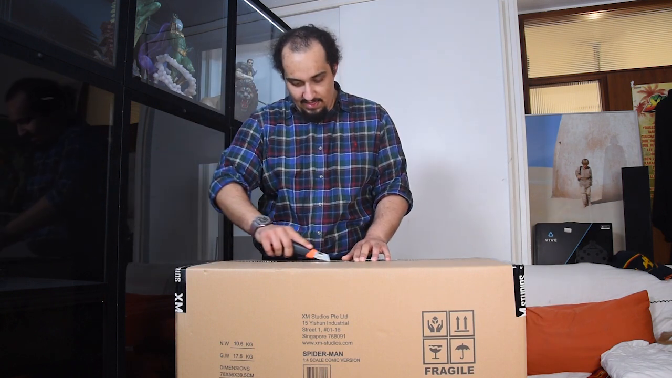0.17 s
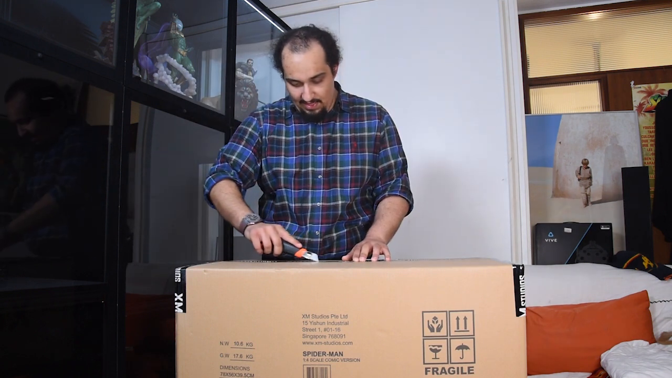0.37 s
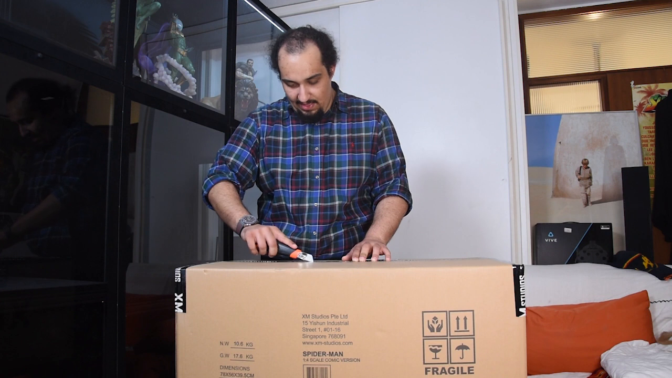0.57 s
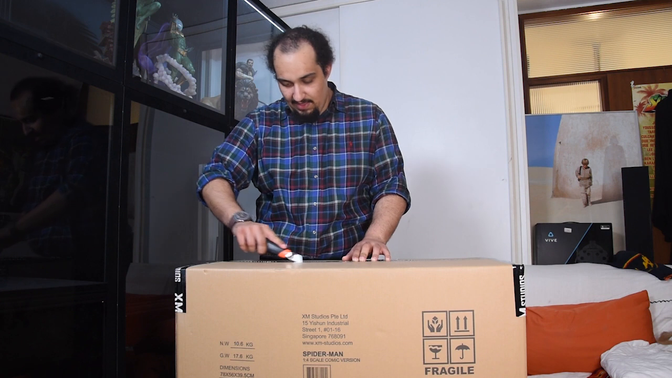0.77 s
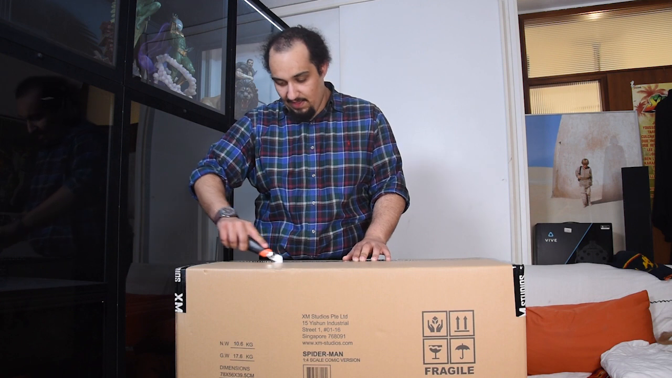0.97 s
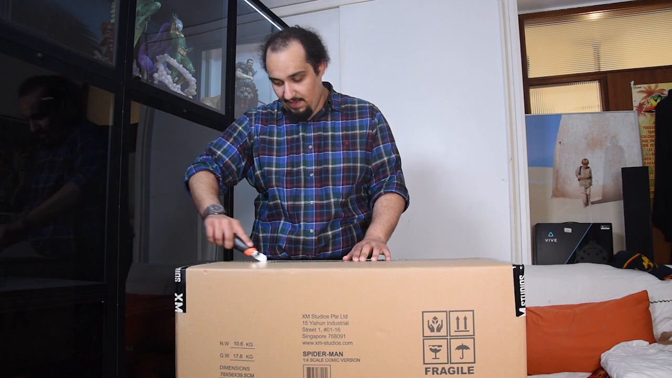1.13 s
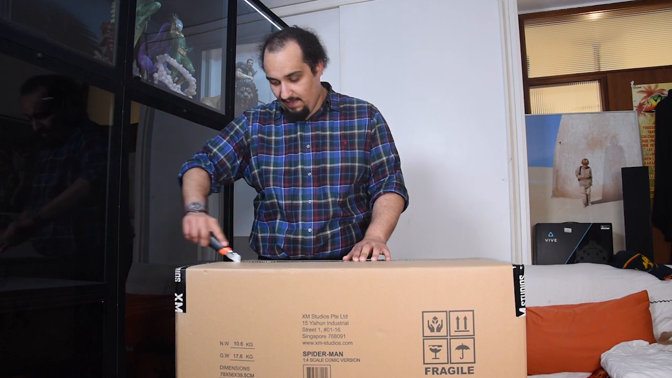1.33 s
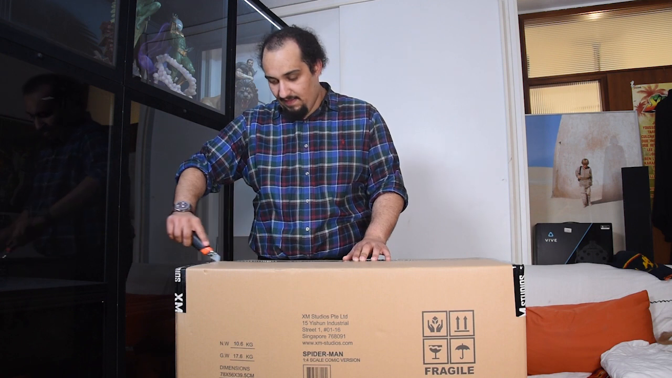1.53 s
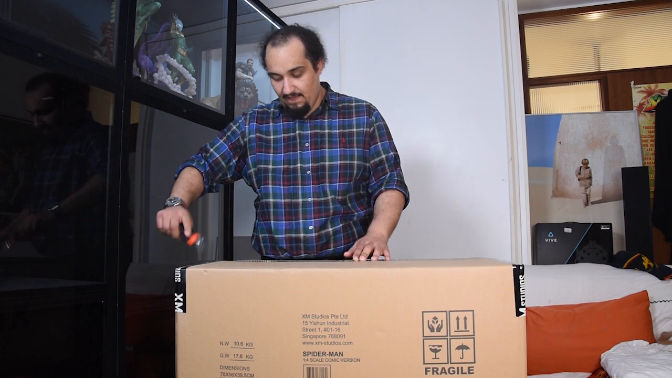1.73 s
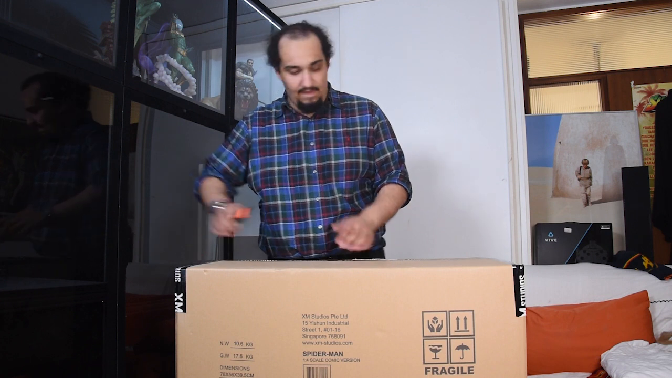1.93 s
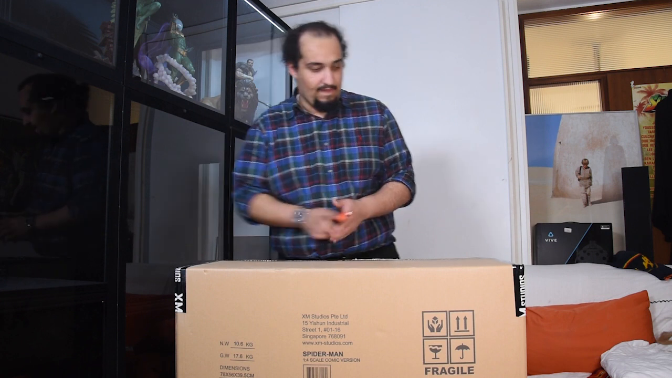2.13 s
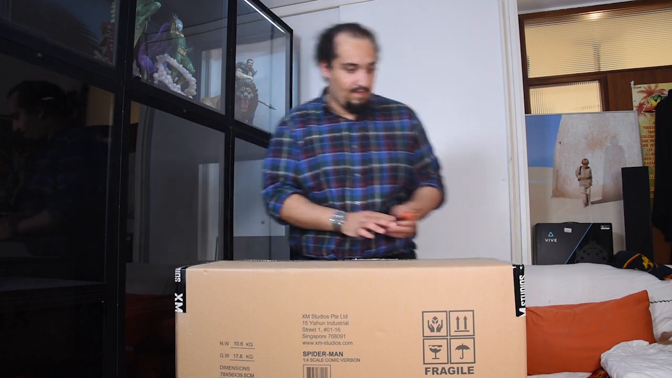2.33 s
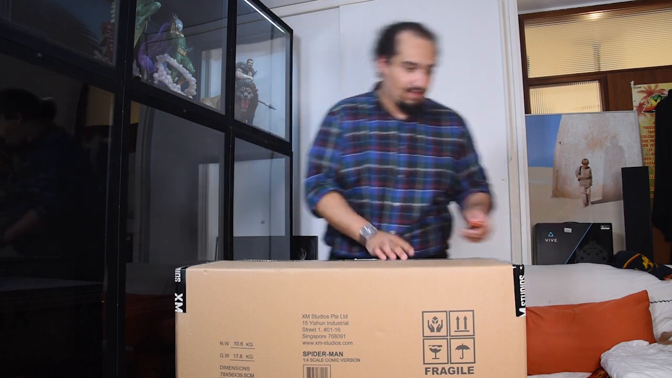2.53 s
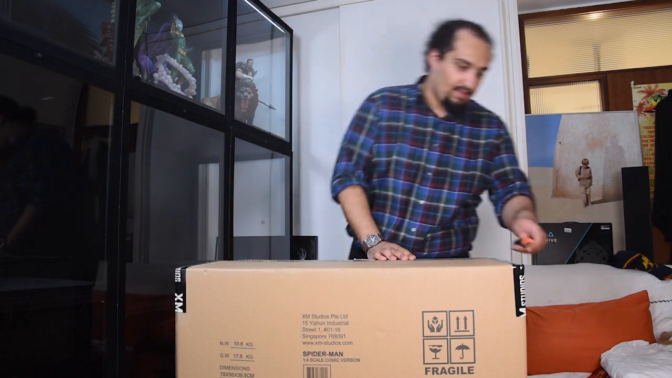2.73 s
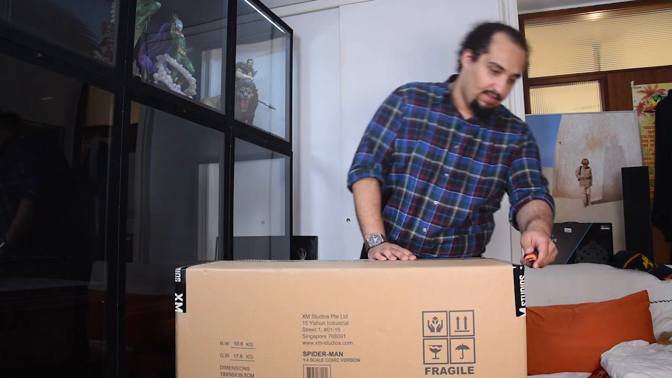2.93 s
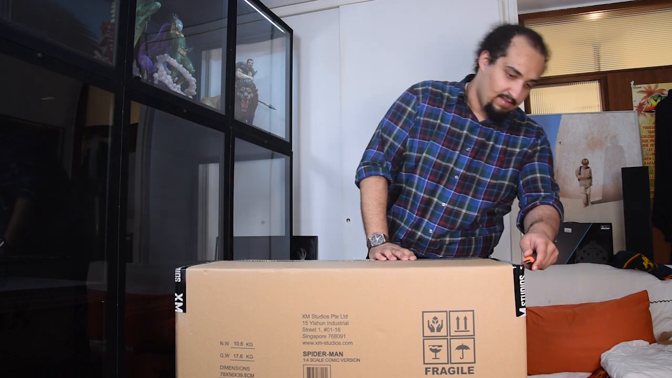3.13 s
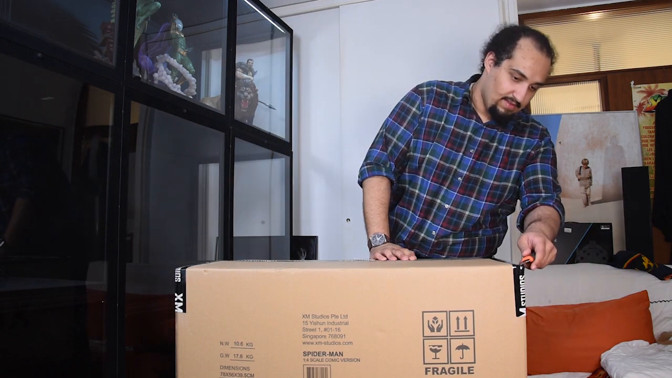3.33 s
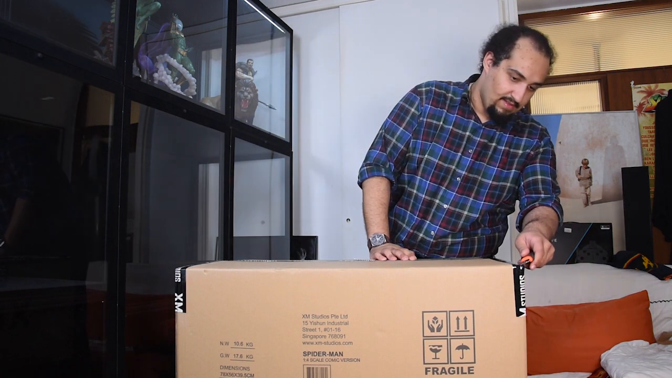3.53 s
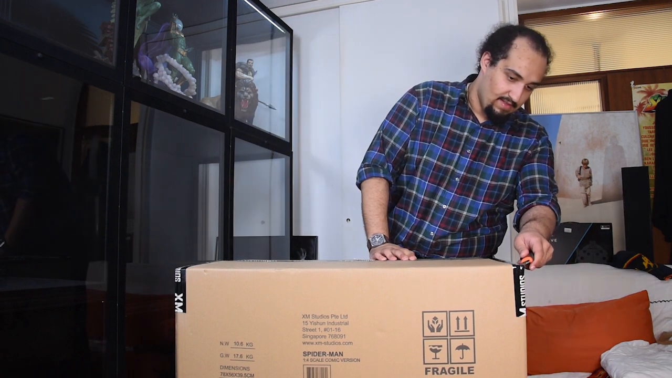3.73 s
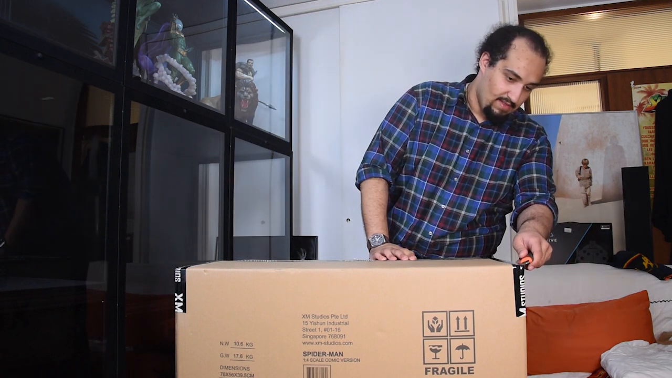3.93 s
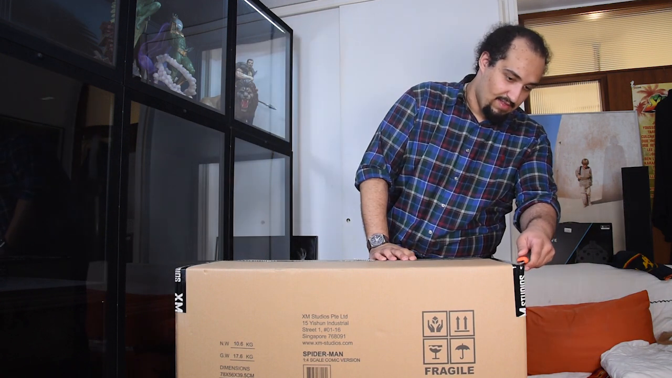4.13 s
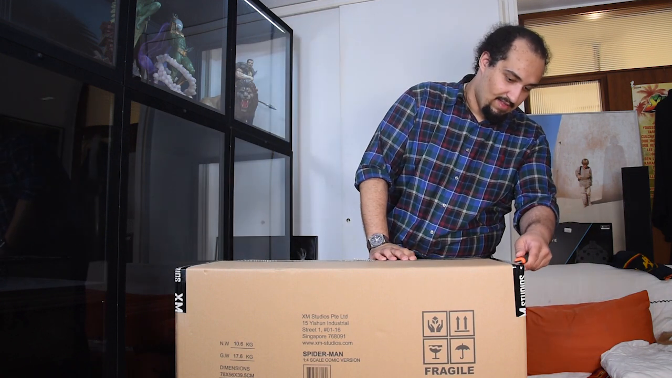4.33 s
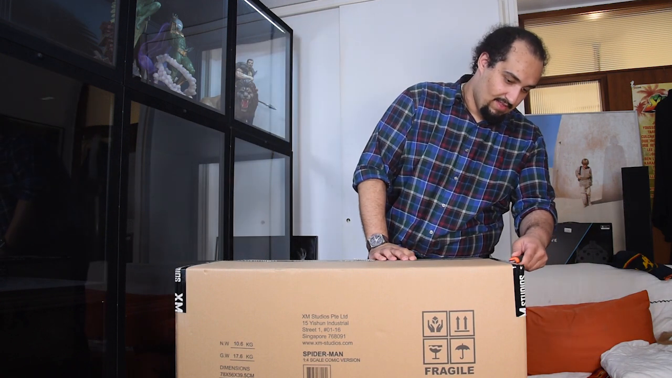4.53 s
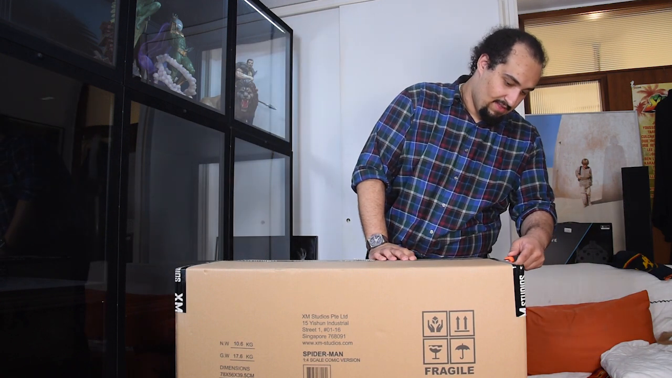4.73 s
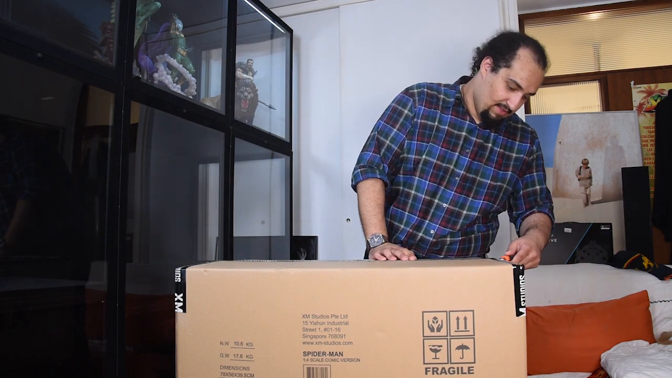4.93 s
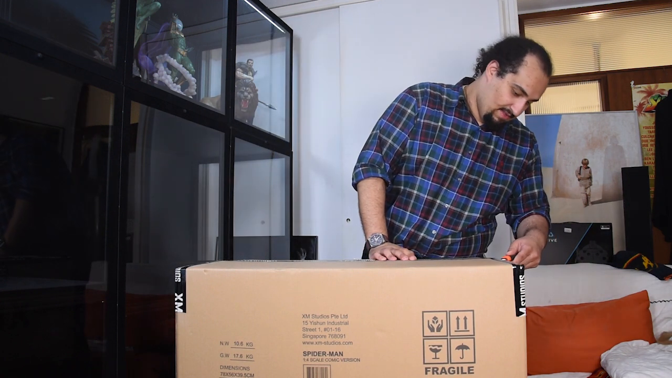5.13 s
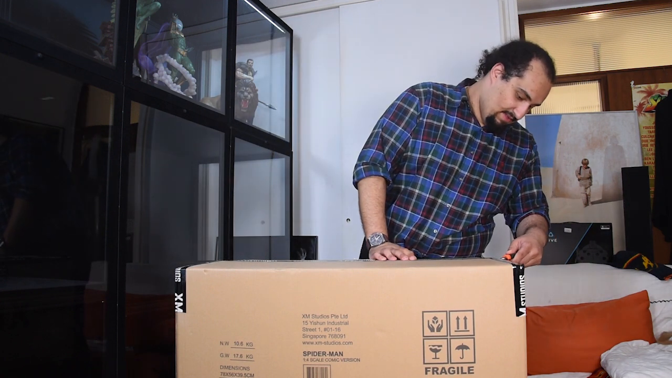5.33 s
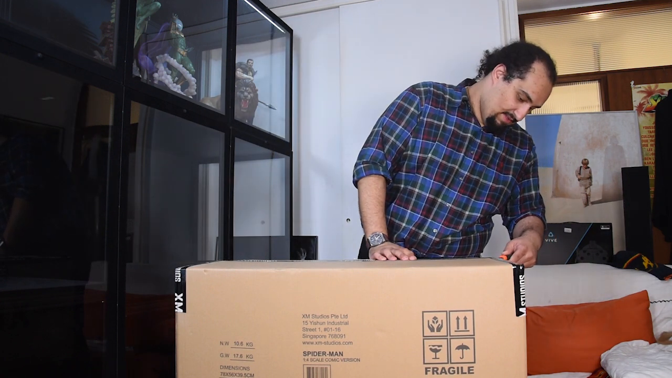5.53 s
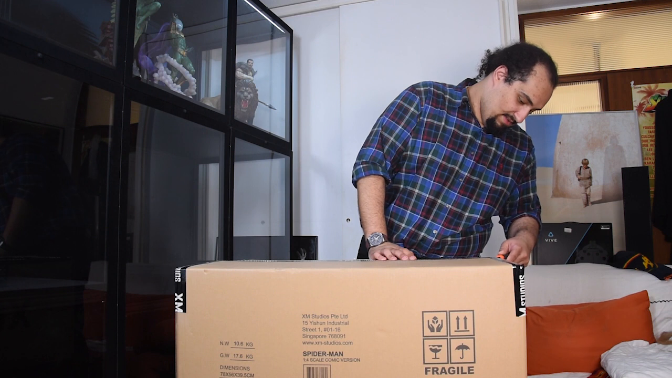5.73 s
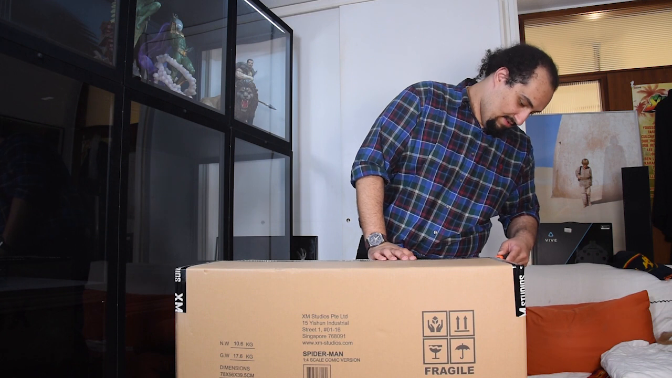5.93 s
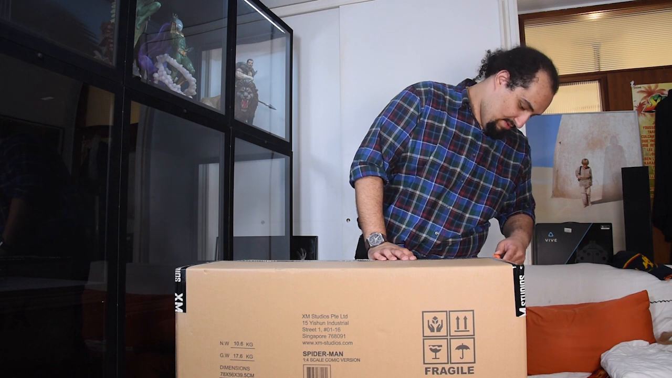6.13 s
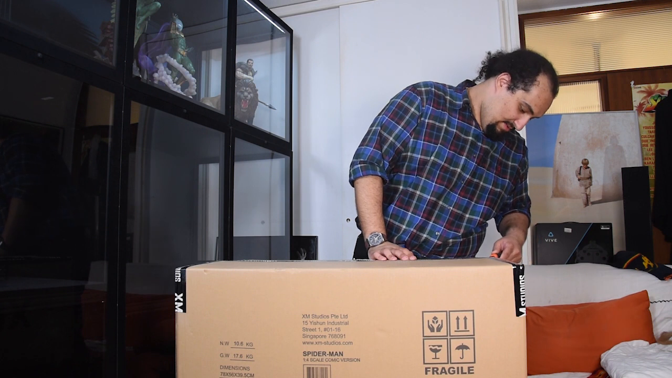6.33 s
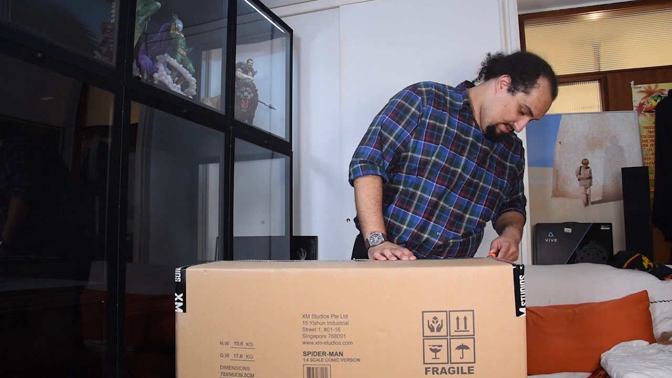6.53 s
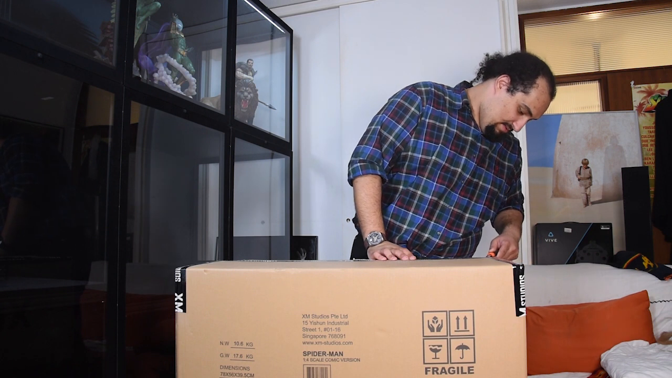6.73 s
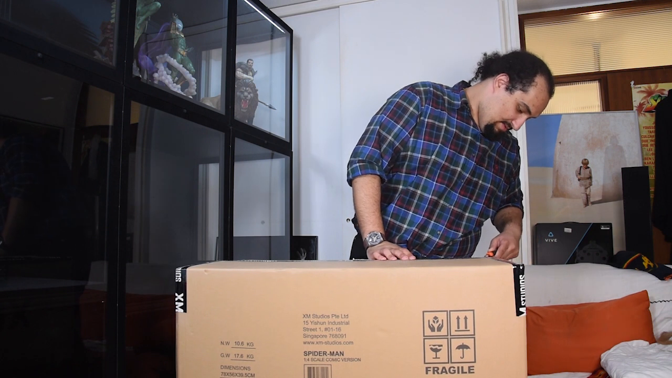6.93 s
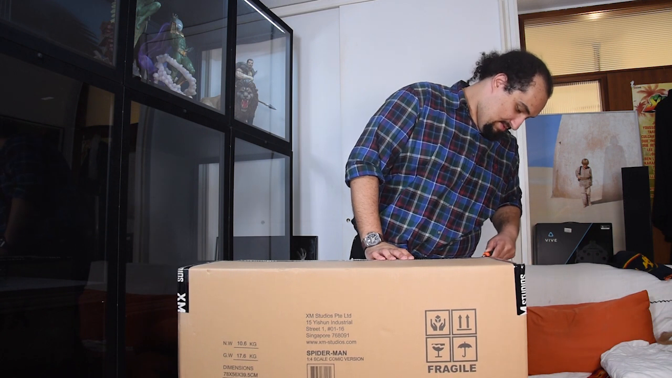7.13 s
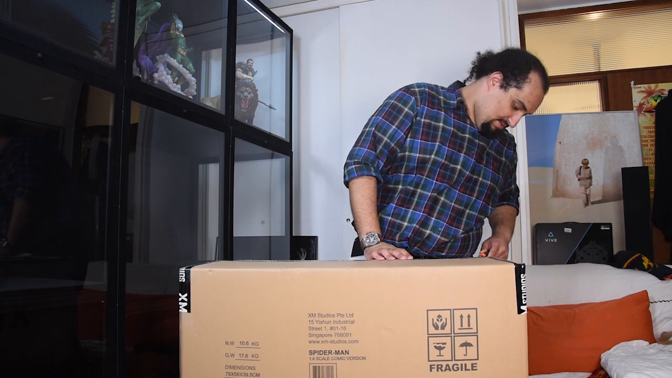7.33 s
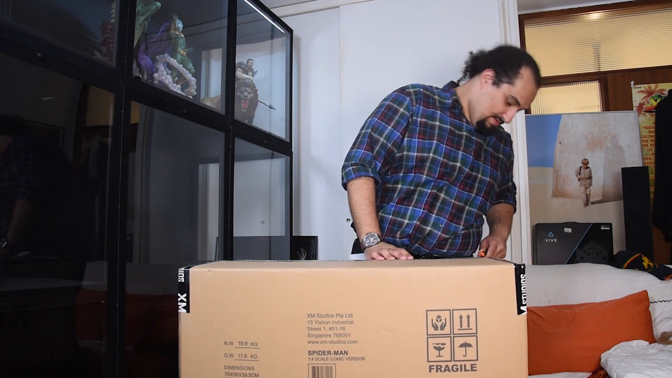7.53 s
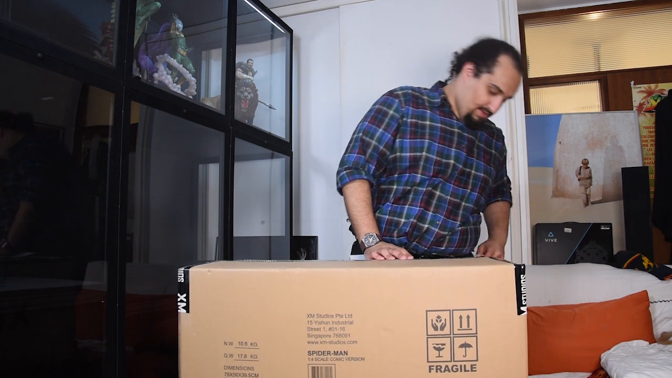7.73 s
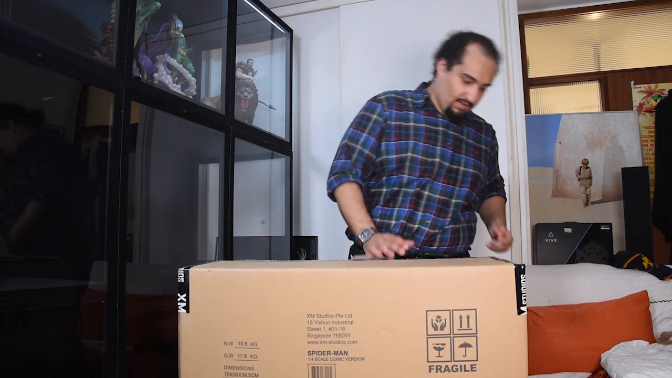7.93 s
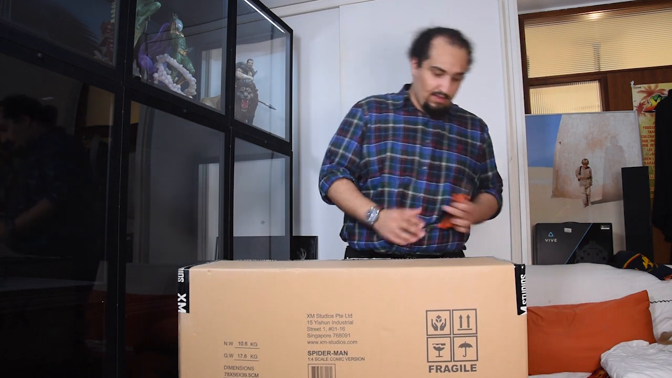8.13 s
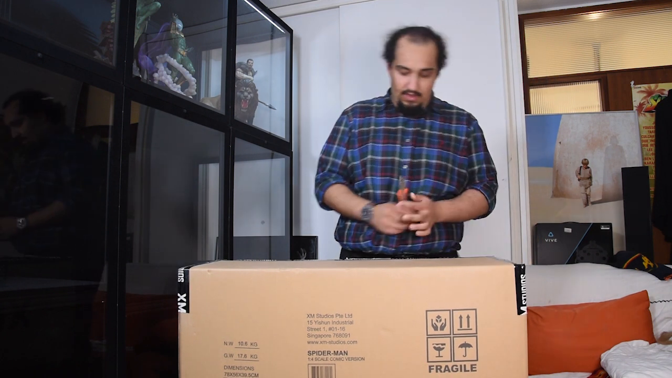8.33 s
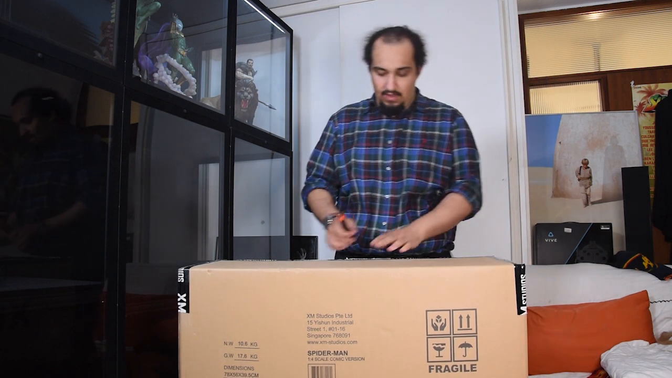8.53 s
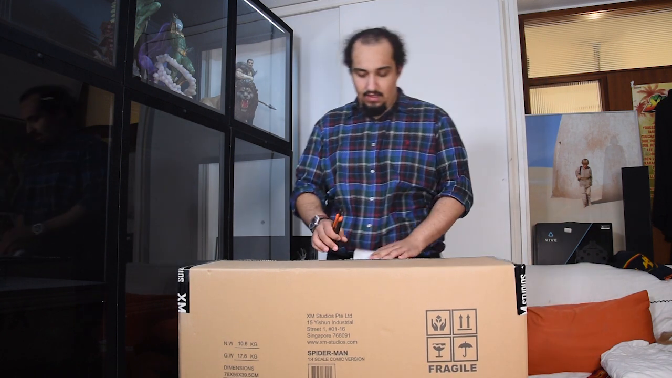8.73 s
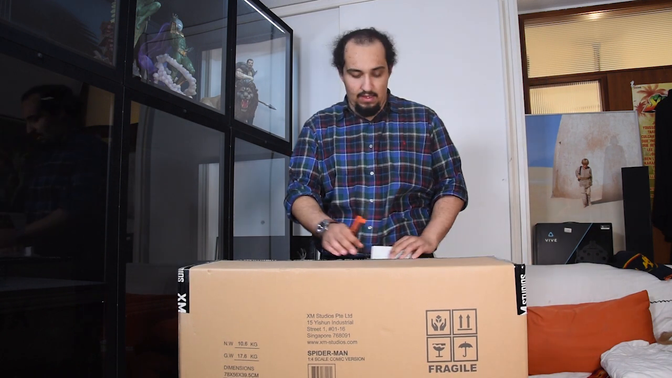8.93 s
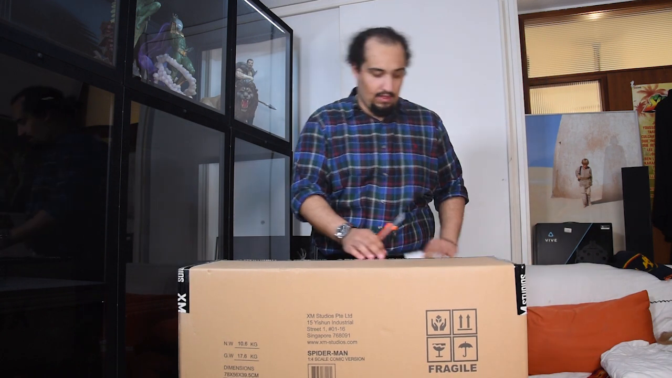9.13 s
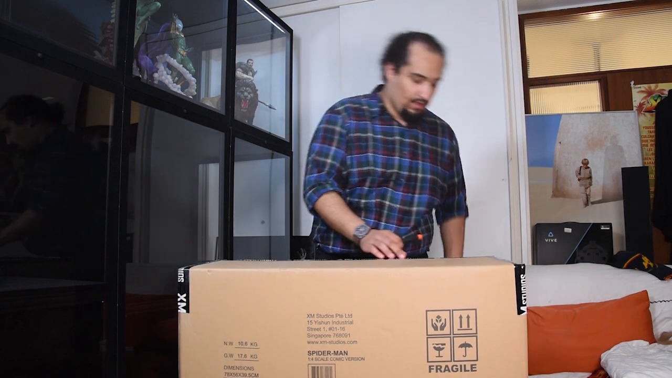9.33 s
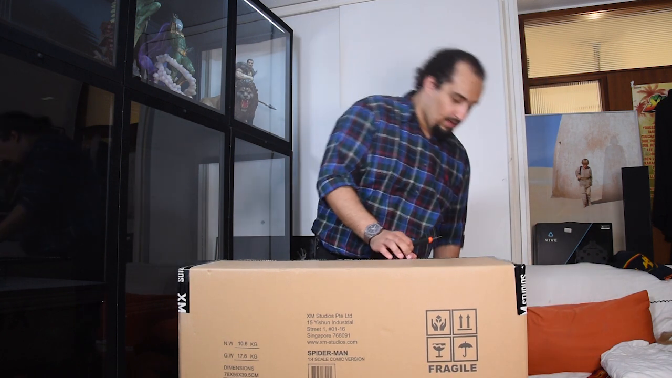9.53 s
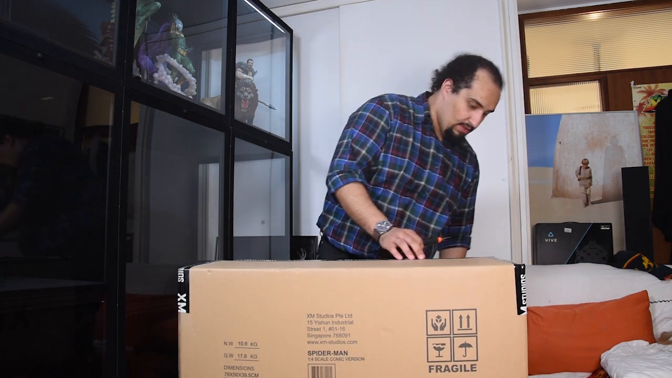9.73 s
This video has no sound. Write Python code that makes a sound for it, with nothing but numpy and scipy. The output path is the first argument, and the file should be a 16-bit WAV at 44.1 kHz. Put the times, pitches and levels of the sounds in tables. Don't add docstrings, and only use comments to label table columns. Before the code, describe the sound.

Hands knock and pat a large carton, a cutter tears through its tape in rough bursts, and finally a palm sweeps dryly across the top.

```python
import sys
import numpy as np
from scipy import signal
from scipy.fft import rfft, irfft
from scipy.io import wavfile

SR = 44100
rng = np.random.default_rng(int(sys.argv[2]) if len(sys.argv) > 2 else 0)


def to_wav(s):
    ch = np.atleast_2d(s).T
    pcm = np.round(np.clip(ch, -1, 1) * 32767)
    wavfile.write(sys.argv[1], SR, pcm.astype(np.int16))


def volts_from_db(level):
    exponent = np.asarray(level, float) / 20
    return 10 ** exponent


N = 431298

# pitch_hz, level_db (per Hz)
HISS_COLOUR = [(15, -31), (25, -11), (140, 4), (253, -5), (530, -5), (2120, -23), (9580, -17.5),
               (15600, -10)]
# start_s, level_db
HANDLING = [
    [(0.0, -46.5), (0.154, -55), (0.318, -47), (0.568, -58.5), (0.724, -49.5), (0.855, -39.5)],
    [(1.75, -47), (1.898, -51), (2.17, -51.5)],
    [(2.185, -42.5), (2.227, -45.5), (2.363, -44), (2.8, -47), (2.9, -43.5), (3.0, -46)],
    [(3.01, -44.5), (3.254, -43.5), (3.406, -46), (3.496, -53), (3.968, -52), (4.02, -61)],
    [(7.075, -40), (7.14, -35.5), (7.22, -41), (7.32, -39.5)],
    [(7.96, -46), (8.036, -50.5), (8.298, -54.5), (8.69, -51.5)],
    [(9.08, -33.5), (9.235, -28), (9.26, -39.5), (9.36, -35.5), (9.45, -44.5), (9.51, -43.5), (9.56, -38.5),
     (9.72, -41), (9.78, -40)],
]
# scrape_db, panel_db
HANDLING_MIX = [(-10, 4.5), (-0.5, -14), (2, -1.5), (-3.5, -6.5), (-1.5, -11), (6.5, 2.5), (-3.5, -7.5)]
# start_s, level_db
CUTS = [
    [(0.862, -28.5), (0.918, -24.5), (1.042, -35), (1.338, -20.5), (1.526, -24), (1.576, -29), (1.698, -32),
     (1.74, -67)],
    [(4.03, -43.5), (4.096, -38), (4.222, -44), (4.42, -41.5)],
    [(4.43, -35.5), (4.494, -30), (4.646, -33.5), (4.926, -37.5), (5.074, -31.5), (5.12, -32),
     (5.16, -28.5), (5.22, -35.5), (5.27, -49), (5.44, -50)],
    [(5.46, -42), (5.526, -31.5), (5.646, -23), (5.7, -32)],
    [(5.71, -27), (5.826, -27), (5.94, -27.5), (5.99, -27.5), (6.17, -33), (6.25, -28.5), (6.275, -36),
     (6.3, -29)],
    [(6.31, -29), (6.408, -27), (6.54, -27.5), (6.65, -29.5), (6.75, -31.5), (6.88, -31.5), (6.99, -29.5),
     (7.06, -42)],
    [(7.33, -37.5), (7.398, -26.5), (7.54, -36)],
    [(7.55, -34.5), (7.632, -25.5), (7.722, -26.5), (7.838, -36.5), (7.95, -39.5)],
]
# scrape_db, panel_db
CUT_MIX = [(-6, -1.5), (-2, -5.5), (-2.5, -4), (1, -2.5), (0, 2), (-5, -0.5), (-10, -6), (-6.5, -6)]
# pitch_hz, level_db (per Hz)
TEAR_COLOUR = [(1470, -35), (2500, 2), (2800, 2), (3500, 0), (4650, -0.5), (7520, -0.5), (10600, -5.5),
               (15600, -23)]
# pitch_hz, width_hz, level_db
SCRAPE_MODES = [(1560, 1490, 17), (2540, 69, 15), (2600, 18, 14), (3500, 4300, -11)]
# pitch_hz, width_hz, level_db
TOP_PANEL = [(103, 17, -7), (198.5, 50, -4), (279.3, 14, -5), (360, 92, -6), (677, 130, -3),
             (918, 138, 1.5), (990, 232, 0), (1360, 670, -8.5)]
# pitch_hz, width_hz, level_db
EDGE_PANEL = [(160, 45, -11), (310, 45, -8), (460, 110, -9), (640, 40, -6), (770, 45, -1), (865, 105, 1.5),
              (1050, 75, -3), (1355, 70, -5.5)]
# pitch_hz, width_hz, level_db
LOW_PANEL = [(161, 90, -5.5), (320, 110, -1), (597, 144, 1), (853, 70, 1.5), (1050, 89, 2.5),
             (1410, 590, -8)]
# pitch_hz, decay_t60_s
WALL_T60 = [(100, 0.3), (700, 0.16), (2000, 0.27), (5000, 0.23), (13000, 0.11)]
# start_s, level_db, pitch_hz, decay_t60_s
KNOCKS = [(0.048, -18, 172, 0.04), (0.094, -40, 168, 0.2), (0.278, -33, 184, 0.24), (0.51, -16, 176, 0.1),
          (0.653, -16, 200, 0.03), (0.654, -19, 880, 0.06), (0.788, -22, 188, 0.07),
          (0.872, -13.5, 261.3, 0.22), (3.931, -43, 136, 0.11), (4.48, -29.5, 423, 0.15),
          (5.583, -32, 306, 0.38), (6.892, -14.5, 295, 0.054), (6.961, -25, 301, 0.074),
          (7.026, -18.5, 355, 0.098), (7.396, -15, 328, 0.022), (7.661, -14, 318, 0.052),
          (7.759, -17, 318, 0.052), (8.028, -25.5, 196, 0.1), (8.481, -24.5, 474, 0.052),
          (0.78, -22, 640, 0.04), (4.19, -26, 260, 0.082), (0.875, -8.5, 828, 0.074),
          (5.58, -12, 1050, 0.046), (1.305, -18, 877, 0.16), (1.41, -11, 900, 0.084),
          (4.78, -18, 870, 0.034), (0.876, -8, 197, 0.15), (7.766, 0.5, 570, 0.024),
          (0.5095, -12, 553, 0.036), (0.513, -15, 958, 0.06), (2.634, -23, 560, 0.035),
          (4.218, -32, 290, 0.072), (0.658, -9, 536, 0.026), (8.707, -22, 187, 0.033),
          (7.716, -16, 906, 0.074), (5.045, -16, 830, 0.1), (5.232, -19, 830, 0.05),
          (9.169, -22, 222, 0.034)]
# start_s, level_db, pitch_hz, decay_t60_s
PATS = [
    (0.517, -11, 172, 0.07),
    (0.661, -9.5, 178, 0.08),
    (2.633, -12, 185, 0.075),
    (8.478, -18, 770, 0.11),
    (8.716, -13, 190, 0.07),
]
# start_s, level_db, pitch_hz, decay_t60_s
BLADE_RINGS = [
    (0.6565, -23, 2680, 0.09),
    (0.8756, -19, 2750, 0.06),
    (4.591, -22, 3000, 0.06),
    (9.53, -29, 3500, 0.07),
    (8.329, -36, 1800, 0.04),
]
# start_s, level_db, pitch_hz, decay_t60_s
STEPS = [
    (2.515, -24.5, 65, 0.15),
    (2.559, -30, 63, 0.3),
    (2.719, -42, 51.1, 0.36),
    (7.099, -43, 97, 0.33),
]
# start_s, level_db, pitch_hz
TOP_TICKS = [(0.0989, -32, 5780), (0.1019, -32, 4860), (0.1062, -31, 5440), (0.1731, -33, 4550),
             (0.3108, -26, 8580), (0.5109, 1, 6830), (0.5132, -15, 6460), (0.5337, -12, 7230),
             (0.6564, -26, 4610), (0.7127, -32, 6880), (0.8481, -26, 7170), (0.8631, -11, 6780),
             (0.8737, -6, 7090), (0.9681, -8, 6110), (0.9937, -7, 7520), (0.9964, -13, 6330),
             (1.0285, -10, 6660), (1.0765, -11, 6990), (1.1026, -9, 6470), (1.1059, -9, 5480),
             (1.1284, -10, 7200), (1.154, -11, 7710), (1.1843, -12, 6320), (1.1867, -12, 6210),
             (1.2401, -9, 8750), (1.2432, -11, 6140), (1.2461, -10, 6440), (1.2653, -9, 6690),
             (1.2684, -2, 6480), (1.3182, -5, 7340), (1.3282, -7, 6390), (1.3468, -9, 6510),
             (1.4146, -13, 5830), (1.4367, -13, 5660), (1.5019, -9, 7790), (1.5201, -12, 8030),
             (1.5352, -14, 7790), (1.6558, -12, 7350), (1.6593, -3, 6010), (1.6685, -11, 7420),
             (1.765, -20, 7530), (1.8092, -28, 5400), (1.8863, -33, 6690), (1.8908, -33, 7700),
             (1.8964, -32, 5760), (2.2194, -24, 5270), (2.4914, -29, 7050), (2.5101, -29, 6390),
             (3.0715, -21, 8490), (3.558, -37, 1900), (3.654, -34, 3900), (3.9255, -35, 2300),
             (3.6708, -11, 6470), (3.7778, -29, 6300)]
# start_s, level_db, pitch_hz
EDGE_TICKS = [(4.0398, -24, 7330), (4.0617, -21, 7330), (4.1167, -16, 5260), (4.1199, -25, 4490),
              (4.1431, -15, 5650), (4.1821, -19, 5270), (4.1852, -11, 7740), (4.2173, -3, 6630),
              (4.2222, 0, 7510), (4.2297, 1, 4930), (4.4311, -22, 7350), (4.5725, -12, 8640),
              (4.5892, -13, 5810), (4.6588, -15, 9940), (4.6919, -15, 8540), (4.7306, -24, 6200),
              (4.7993, -10, 7700), (4.8862, -19, 5360), (4.9017, -15, 6830), (4.9848, -21, 12090),
              (4.987, -13, 7120), (4.9894, -5, 7400), (5.0098, -13, 9460), (5.0487, -13, 8560),
              (5.0576, -12, 5950), (5.064, -13, 8340), (5.0694, -12, 6100), (5.1419, -12, 6700),
              (5.2131, -20, 8490), (5.3884, -34, 7810), (5.4185, -36, 6910), (5.45, -27, 7040),
              (5.4796, -5, 7120), (5.4976, -15, 8470)]
# start_s, level_db, pitch_hz
LOW_TICKS = [(5.5791, -5, 7380), (5.6426, -8, 6810), (6.0689, -19, 5770), (6.2394, -14, 8410),
             (6.3648, -9, 8660), (6.37, -9, 6000), (6.7178, -11, 12550), (6.8676, -21, 5730),
             (6.8926, -15, 7170), (6.8982, -13, 7540), (6.9611, -10, 9370), (7.0143, -8, 6150),
             (7.0228, -6, 7280), (7.0306, -7, 6430), (7.033, -5, 7300), (7.0745, -11, 6870),
             (7.0793, -11, 5820), (7.1509, -18, 7520), (7.3348, -10, 7970), (7.3521, -8, 8120),
             (7.3973, -2, 8370), (7.4003, -3, 8230), (7.413, -4, 8620), (7.4587, -14, 5080),
             (7.5607, -20, 6070), (7.5638, -20, 5840), (7.7481, -9, 8150), (7.7698, -7, 4980),
             (8.021, -26, 10040), (8.0243, -28, 9690), (8.0668, -31, 5690), (8.3307, -32, 4270),
             (8.4462, -31, 6850), (8.4518, -28, 6630), (8.4549, -27, 7360), (8.7083, -27, 6970),
             (9.1921, -15, 5700), (9.4742, -30, 5340), (9.665, -8, 8240)]
# start_s, lag_s
WALL_ECHO = [(0, .0055), (6.9, .0055), (7.0, .0049), (7.5, .0049), (7.6, .0057)]
# start_s, level_db, pitch_hz, burst_s
SLIPS = [(0.099, -23.5, 2750, 0.0048), (0.5115, -5.5, 8000, 0.0023), (0.652, -16, 2330, 0.0053),
         (0.871, -12.5, 2600, 0.015), (0.918, -11.5, 5200, 0.0059), (0.511, -7.5, 1800, 0.01),
         (4.112, -20, 4600, 0.0045), (4.154, -20.5, 5000, 0.0081), (4.1815, -14, 7500, 0.0052),
         (4.2135, -10, 3840, 0.0038), (4.428, -29, 3070, 0.0045), (4.481, -15, 3080, 0.0035),
         (4.8, -22.5, 4540, 0.0046), (5.05, -10.5, 2900, 0.022), (5.232, -13.5, 3100, 0.0085),
         (5.481, -18.5, 7360, 0.0035), (5.5745, -8, 7500, 0.011), (5.578, -8, 3280, 0.017),
         (6.237, -14, 3000, 0.0051), (6.3594, -18.5, 4550, 0.012), (6.4906, -11, 5200, 0.01),
         (6.725, -17.5, 3730, 0.0064), (6.958, -10.5, 4450, 0.0045), (7.494, -18, 8150, 0.0026),
         (7.666, -13, 2790, 0.0079)]
# start_s, level_db, pitch_hz, burst_s
TAPE_SNAPS = [(0.3044, -31, 7840, 0.0053), (0.8624, -28, 2700, 0.0037), (0.8905, -8.5, 7260, 0.0041),
              (1.6572, -6, 4500, 0.0032), (7.774, -2, 2200, 0.01), (3.6687, -19, 2220, 0.011),
              (3.67, -26, 4900, 0.0088), (3.776, -33, 2610, 0.0046), (4.0466, -23, 2900, 0.01),
              (4.0584, -26, 3800, 0.0057), (4.2215, -2, 3800, 0.013), (4.2215, -1.5, 8200, 0.0088),
              (4.24, -8.5, 3820, 0.01), (4.5662, -23, 4120, 0.0067), (4.589, -14, 2900, 0.013),
              (4.689, -30, 3720, 0.0057), (4.885, -23, 3570, 0.01), (4.8992, -18, 2920, 0.01),
              (4.987, -23, 8200, 0.0075), (5.1411, -18, 3800, 0.0043), (5.7169, -16.5, 2730, 0.017),
              (6.8914, -8, 2600, 0.0047), (7.02, -11.5, 7600, 0.014), (7.022, -12, 3970, 0.025),
              (7.1502, -20, 3470, 0.005), (7.3345, -15, 8940, 0.0047), (7.353, -19, 8290, 0.01),
              (7.4, -12, 7000, 0.006), (7.411, -11, 7000, 0.0066), (7.7657, -5.5, 4470, 0.006),
              (8.0092, -31, 3530, 0.02), (8.4474, -28, 4800, 0.021), (9.472, -27, 2690, 0.0081),
              (9.518, -23.5, 8500, 0.018), (9.5264, -16.5, 3500, 0.0087), (9.5857, -21, 3050, 0.006)]
# start_s, level_db, pitch_hz, burst_s
MORE_SLIPS = [(5.2125, -18.5, 8400, 0.0084), (5.815, -13, 2980, 0.014), (5.95, -19, 5900, 0.025),
              (6.41, -24, 7000, 0.0071), (6.478, -12, 2560, 0.011), (6.56, -22, 5600, 0.0086),
              (5.7586, -16.5, 3070, 0.03), (5.8801, -15.5, 2570, 0.016), (7.004, -11, 3750, 0.0085),
              (7.558, -21, 4060, 0.0083), (7.585, -18.5, 4130, 0.013), (7.7137, -16, 6160, 0.042),
              (7.7465, -10, 8060, 0.0048), (7.7725, -13.5, 4360, 0.0092)]
# start_s, level_db, pitch_hz, jolt_db, burst_s
RUSTLES = [(0.173, -30, 3880, -12.5, 0.041), (0.78, -32, 2730, -7, 0.0046), (1.7966, -24, 1960, -6, 0.0027),
           (1.8846, -27.5, 1780, -14, 0.0032), (2.6736, -22, 2680, -20, 0.027),
           (3.2814, -23.5, 2760, -20, 0.0071), (1.6, -10.5, 2900, -14, 0.021),
           (2.218, -21, 2800, -22, 0.01), (3.65, -25, 2680, -27, 0.011), (8.327, -21.5, 1820, -41, 0.0081),
           (8.478, -14.5, 1500, -24, 0.008), (8.7053, -31, 8900, -7, 0.011), (8.706, -22, 1600, -28, 0.02),
           (9.169, -13, 1800, -14, 0.0054), (9.189, -11, 2220, -16.5, 0.0046),
           (9.213, -13, 1800, -21, 0.015), (9.656, -26, 2500, -14, 0.0057), (9.662, -22, 8500, -16, 0.003),
           (9.7411, -19.5, 2210, -21, 0.012)]
# start_s, level_db
SWIPE = [(8.69, -57), (8.706, -49), (8.736, -35), (8.87, -29), (9.052, -31), (9.226, -36), (9.276, -51),
         (9.368, -48), (9.42, -65)]
# pitch_hz, level_db (per Hz)
PALM_COLOUR = [(150, -45), (250, -22.5), (366, -6), (670, -28), (824, -6.5), (2720, 1.5), (8800, 5),
               (15600, -10)]
# pitch_hz, side_minus_mid_db
SPREAD = [(60, -16), (200, -39), (500, -32), (1290, -35), (2380, -29), (4400, -22.5), (8120, -19.5),
          (15000, -16.5)]

FLUTES_FROM_S, FLUTE_S, FLUTE_COUNT = 0.962, 0.0275, 14


def in_time(rows):
    s, *columns = np.transpose(rows)
    return [np.interp(np.arange(N) / SR, s, column) for column in columns]


def at_hz(points, hz):
    points = np.array(points)
    return np.interp(np.log(hz + 1), np.log(points[:, 0]), points[:, 1])


def rms_one(x):
    return x / np.sqrt(np.mean(x ** 2) + 1e-20)


def coloured(x, spectrum):
    hz = np.fft.rfftfreq(N, 1 / SR)
    inside = (hz > spectrum[0][0]) & (hz < spectrum[-1][0])
    return irfft(rfft(x) * volts_from_db(at_hz(spectrum, hz)) * inside, N)


def flicker(rate):
    r = np.exp(-2 * np.pi * rate / SR)
    drift = signal.lfilter([1], [1, -2 * r, r * r], rng.standard_normal(N + SR))
    return rms_one(drift[SR:])


def resonance(x, hz, width):
    r = np.exp(-np.pi * width / SR)
    zeros = np.array([1, 0, -1]) * (1 - r * r) / 2
    return signal.lfilter(zeros, [1, -2 * r * np.cos(2 * np.pi * hz / SR), r * r], x)


def body(x, modes, wander_db=0):
    out = np.zeros(len(x))
    for k, (hz, width, db) in enumerate(modes):
        if wander_db:
            db = db + wander_db * flicker(15)
        out += (-1) ** k * volts_from_db(db) * resonance(x + 1e-18, hz, width)
    return out


def grains(per_s, spread_db, patchy_db, patch_rate):
    sizes = volts_from_db(spread_db * np.minimum(rng.exponential(1, N), 5)) * rng.choice([-1, 1], N)
    breaking = rng.random(N) < per_s / SR
    return sizes * breaking * volts_from_db(patchy_db * flicker(patch_rate))


def hiss():
    noise = coloured(rng.standard_normal(N), HISS_COLOUR)
    top_band = signal.butter(6, [13000, 15500], "band", fs=SR, output="sos")
    return volts_from_db(-55.5) * noise / np.std(signal.sosfilt(top_band, noise))


def pressure():
    rows = []
    for curve, (scrape_db, panel_db) in zip(CUTS + HANDLING, CUT_MIX + HANDLING_MIX):
        rows += [(s, db, db + scrape_db, db + panel_db) for s, db in curve]
    return sorted(rows)


def strokes():
    tear_db, scrape_db, panel_db = in_time(pressure())
    crossed = (np.arange(N) / SR - FLUTES_FROM_S) / FLUTE_S
    tear_db = tear_db - 7 * ((crossed > -1) & (crossed < FLUTE_COUNT - 1))
    fibres = grains(5000, spread_db=3.0, patchy_db=1.8, patch_rate=70)
    tearing = rms_one(coloured(fibres, TEAR_COLOUR))
    contacts = grains(5000, spread_db=2.5, patchy_db=2.4, patch_rate=40)
    scraping = rms_one(body(contacts, SCRAPE_MODES))
    rubbing = rms_one(grains(9000, spread_db=2.0, patchy_db=2.0, patch_rate=30))
    air = volts_from_db(tear_db - 3.5) * tearing + volts_from_db(scrape_db - 3.0) * scraping
    return air, volts_from_db(panel_db - 2.0) * rubbing


def box(force, wander_db=0):
    t, white = np.arange(N) / SR, rng.standard_normal(SR)
    top, edge, low = (body(force, panel, wander_db) / np.std(body(white, panel))
                      for panel in (TOP_PANEL, EDGE_PANEL, LOW_PANEL))
    on_top = (t < 3.9) | (t > 7.95)
    return np.where(on_top, top, np.where(t < 7.3, edge, low))


def room(x):
    stance = 16384
    hop, t, tails = stance // 2, np.arange(stance) / SR, 0
    for low in 45 * 2. ** np.arange(9):
        band = signal.butter(2, [low, min(2 * low, 21000)], "band", fs=SR, output="sos")
        noise = signal.sosfilt(band, rng.standard_normal((8, stance)))
        tails = tails + noise * volts_from_db(-60 * t / at_hz(WALL_T60, 1.2 * low))
    first_echo_s = 0.0091
    tails = tails * np.clip(t / first_echo_s, 0, 1) ** 2
    tails = tails / np.sqrt(np.sum(tails ** 2, axis=1, keepdims=True))
    padded, out = np.pad(x, (hop, stance)), np.zeros(N + 4 * stance)
    fade = np.sqrt(np.hanning(stance))
    for k, start in enumerate(range(0, N + hop, hop)):
        piece = padded[start:start + stance] * fade
        out[start:start + 2 * stance - 1] += signal.fftconvolve(piece, tails[k % 8])
    return out[hop:hop + N]


def thuds(hits, rise_s, partner):
    out, t = np.zeros(N + SR // 2), np.arange(SR // 2) / SR
    for s, peak_db, hz, t60 in hits:
        ring = np.sin(2 * np.pi * hz * t) + .5 * np.sin(2 * np.pi * partner * hz * t)
        start = round(s * SR)
        decay = volts_from_db(peak_db - 4.5 - 60 * t / t60)
        out[start:start + len(t)] += decay * (1 - np.exp(-t / rise_s)) * ring
    return out[:N]


def ticks():
    out, t = np.zeros(N + 200), np.arange(200) / SR
    decay_cycles = 1.15
    for s, peak_db, hz in TOP_TICKS + EDGE_TICKS + LOW_TICKS:
        start = round(s * SR)
        pulse = np.sin(2 * np.pi * hz * t) * np.exp(-t * hz / decay_cycles)
        out[start:start + 200] += volts_from_db(peak_db + 4.0) * pulse
    off_board = out[:N] + .6 * np.roll(out[:N], 17)
    near = signal.sosfilt(signal.butter(1, 1500, "high", fs=SR, output="sos"), off_board)
    lag = (in_time(WALL_ECHO)[0] * SR).astype(int)
    late = near[np.maximum(np.arange(N) - lag, 0)]
    return near + volts_from_db(-5) * signal.sosfilt(signal.butter(1, 7000, fs=SR, output="sos"), late)


def catches():
    events = list(RUSTLES)
    for table, jolt_db in ((SLIPS, -11.5), (TAPE_SNAPS, -25.5), (MORE_SLIPS, -10.5)):
        events += [(s, db + 1, hz, jolt_db, burst_s) for s, db, hz, burst_s in table]
    for k, (late, strong, high) in enumerate(rng.standard_normal((FLUTE_COUNT, 3))):
        s = FLUTES_FROM_S + k * FLUTE_S + 0.001 * late
        events.append((s, -11.5 + 0.8 * strong, 7200 * (1 + 0.16 * high), -9, 0.0059))
    return events


def snaps():
    air, force, t = np.zeros(N + 4000), np.zeros(N + 4000), np.arange(4000) / SR
    crackle = volts_from_db(-13) * np.exp(-t / 0.026)
    for s, peak_db, hz, jolt_db, burst_s in catches():
        bright, dull = rng.standard_normal((2, 4000))
        rise = 1 - np.exp(-t / (0.41 * burst_s))
        flurry = (np.exp(-t / burst_s) + crackle) * rise
        crack = bright * (0.19 + np.abs(dull)) * flurry
        broad = min(1, hz / 4500) * signal.lfilter([1, -1], [1, -.7], crack)
        crack = .8 * broad + 2.0 * resonance(crack, hz, .42 * hz)
        start = round(s * SR)
        air[start:start + 4000] += volts_from_db(peak_db - 8.0) * crack
        force[start:start + 4000] += volts_from_db(peak_db + jolt_db + 3.5) * dull * flurry
    return signal.sosfilt(signal.butter(2, 9550, fs=SR, output="sos"), air[:N]), force[:N]


def swipe():
    t = np.arange(N) / SR
    touching = (t > SWIPE[0][0]) & (t < SWIPE[-1][0])
    skin = grains(20000, spread_db=1.5, patchy_db=.3, patch_rate=60)
    return volts_from_db(in_time(SWIPE)[0] + 2.0) * touching * rms_one(coloured(skin, PALM_COLOUR))


def scene():
    stroke_air, stroke_force = strokes()
    snap_air, snap_force = snaps()
    steady = stroke_air + ticks() + swipe() + box(stroke_force, wander_db=1.8)
    blows = thuds(KNOCKS, rise_s=.002, partner=1.45) + thuds(BLADE_RINGS, rise_s=.001, partner=.93)
    sudden = snap_air + box(snap_force)
    echoes = room(volts_from_db(-7) * sudden + volts_from_db(-11) * blows + volts_from_db(-13.5) * steady)
    pats = thuds(PATS, rise_s=.01, partner=1.06)
    steps = thuds(STEPS, rise_s=.0083, partner=1.43)
    mid = steady + sudden + blows + pats + echoes + steps + hiss()
    side = volts_from_db(2) * coloured(np.roll(mid, 90), SPREAD)
    return mid + side * [[1], [-1]]


def band_limit(x):
    return signal.sosfilt(signal.butter(12, 15710, fs=SR, output="sos"), x)


def record(dry):
    top_cut = signal.cheby2(12, 50, 16500, fs=SR, output="sos")
    mix = signal.sosfilt(top_cut, np.clip(dry, -1, 1))
    return band_limit(mix)


dry = scene()
out = record(dry)
to_wav(out)
```